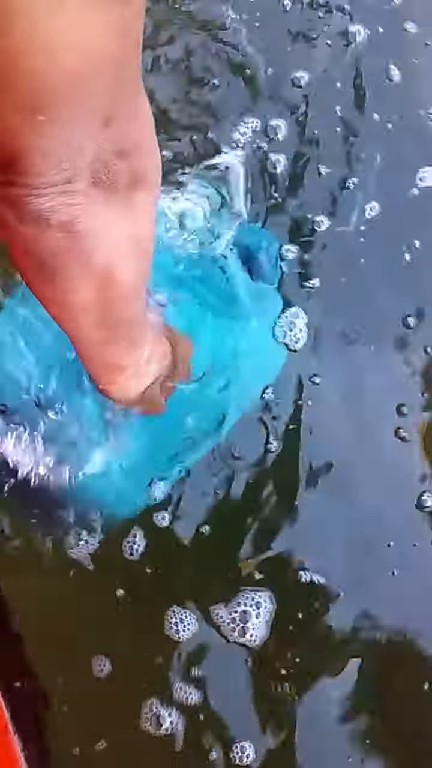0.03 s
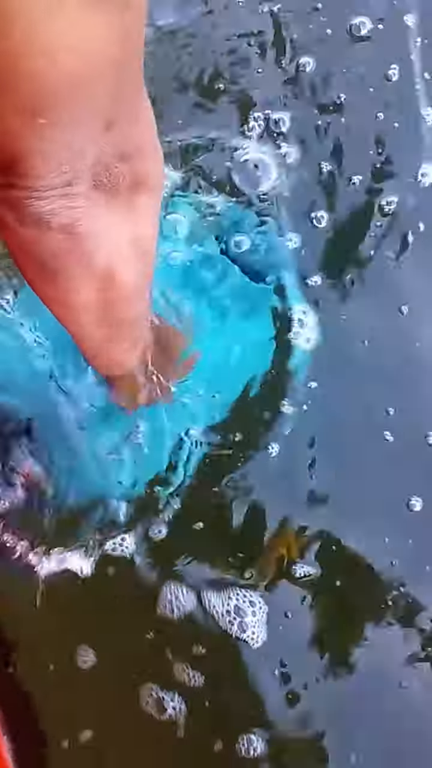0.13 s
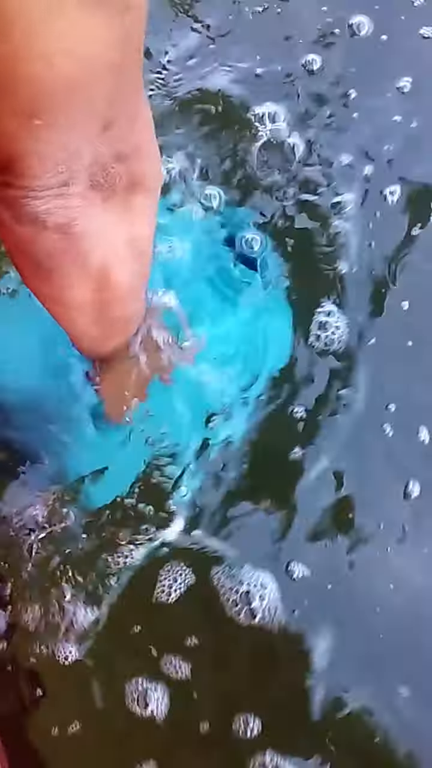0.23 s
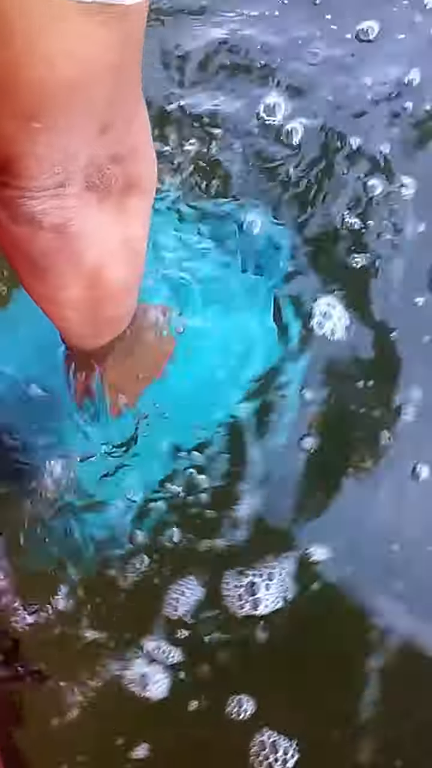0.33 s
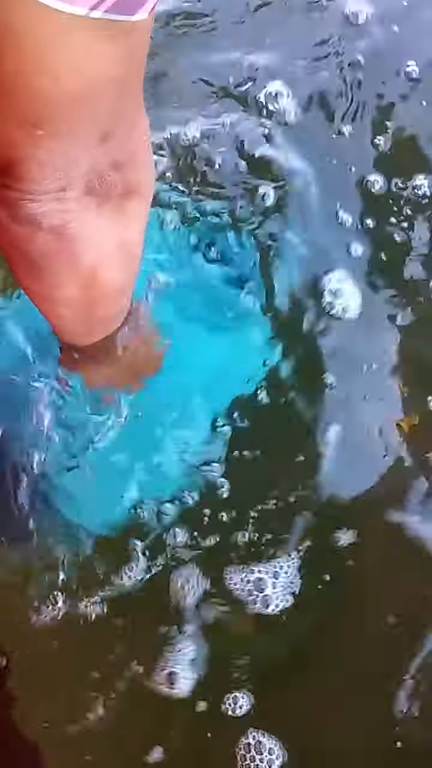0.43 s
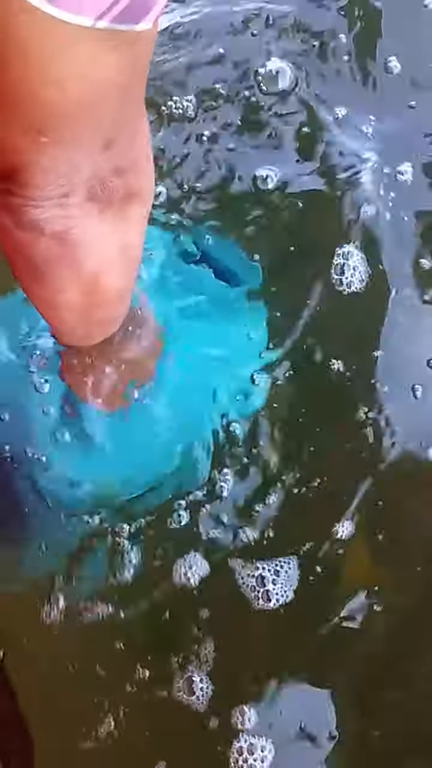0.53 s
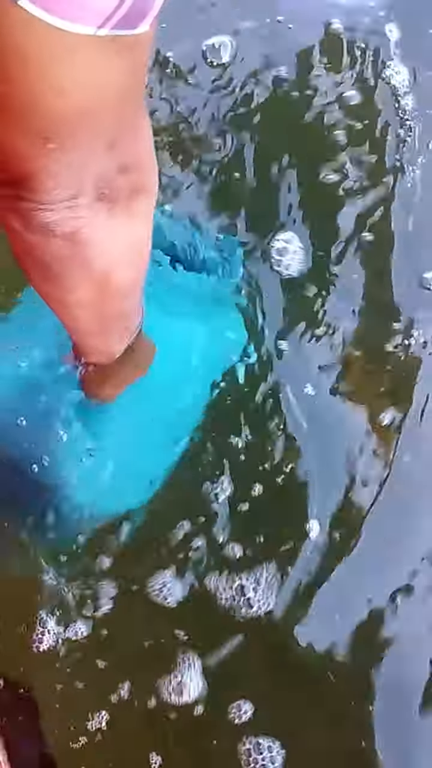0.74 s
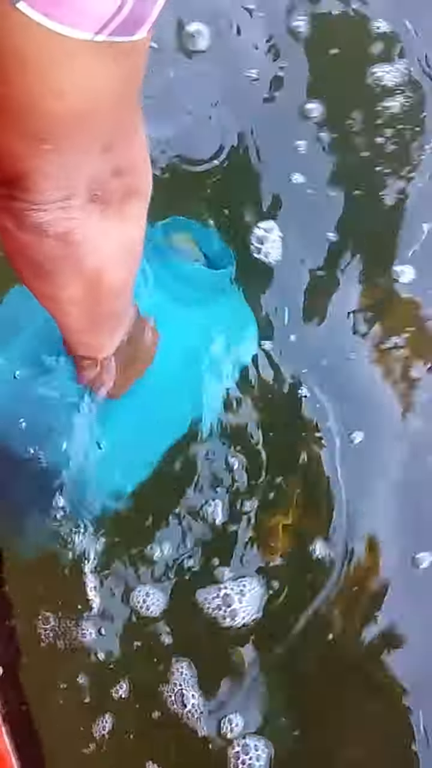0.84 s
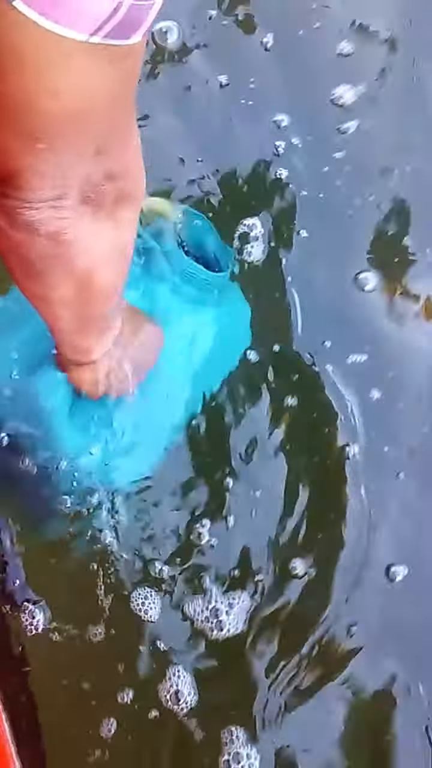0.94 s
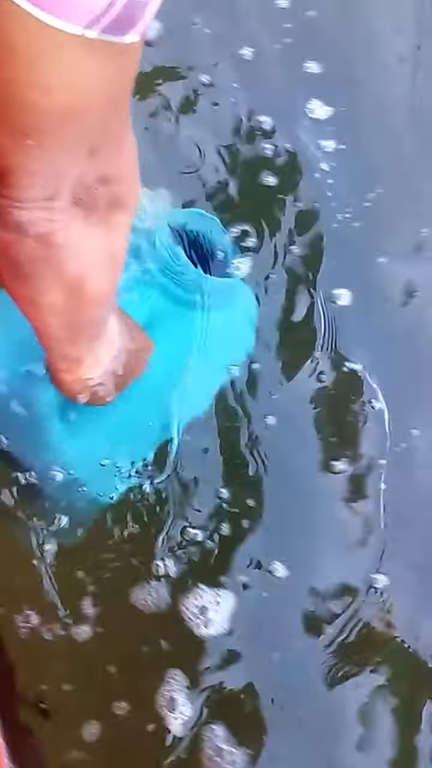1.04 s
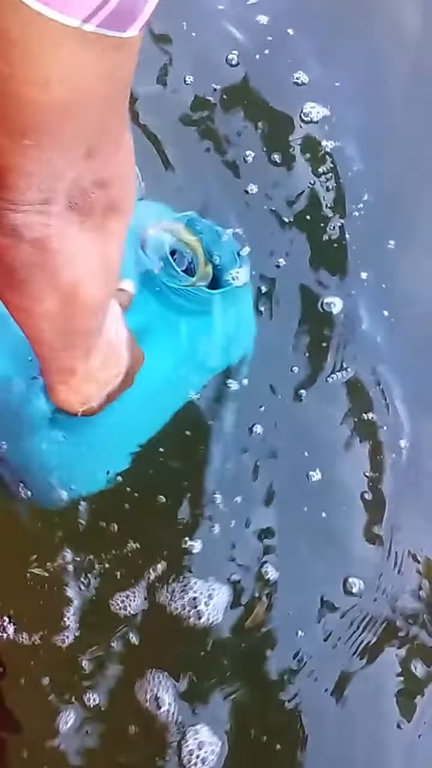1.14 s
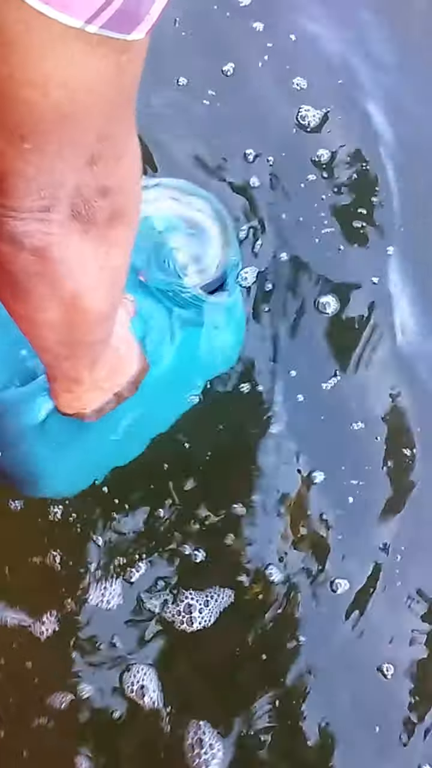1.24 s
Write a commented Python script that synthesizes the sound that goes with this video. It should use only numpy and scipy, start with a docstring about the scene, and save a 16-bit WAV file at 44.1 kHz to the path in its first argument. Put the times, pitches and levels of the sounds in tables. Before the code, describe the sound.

Water gurgles into a plastic can pushed under the sea, close by. Faint foam fizz and a few bubble plinks open the first 0.3 seconds. From about 0.2 seconds a low rumble with dull thumps swells, like wind on the microphone, loudest from 0.4 to 0.6 with glugs and one click. After a smaller glug at 0.8, faint lapping remains, with a soft thump and tiny splash near 1.2.

```python
"""Foam fizzes and a few bubbles plink as a plastic can is pushed under the sea to fill, close by.
A low rumble swells with dull thumps, probably wind buffeting the microphone, while water gurgles
into the can. Each bubble is a damped resonator, its air the spring and the water the mass:
larger ones glug, small ones plink. It settles to faint lapping, with a last soft thump."""
import sys
import numpy as np
from scipy.fft import rfft, irfft, next_fast_len
from scipy.io import wavfile
from scipy.ndimage import uniform_filter1d, map_coordinates

SR = 44100
rng = np.random.default_rng(int(sys.argv[2]) if len(sys.argv) > 2 else 0)


def wav_out(sig):
    """Save sig, one row per channel (or a flat mono array), as 16-bit PCM at SR to the path in sys.argv[1]."""
    wavfile.write(sys.argv[1], SR, np.round(np.clip(np.atleast_2d(sig).T, -1, 1) * 32767).astype(np.int16))


N = 57330
TIME = np.arange(N) / SR


# Low thumps. Each row: time of the crest in seconds, level in dB, pitch in Hz.
LOW_THUMPS = [(.101, -32, 110), (.236, -13.5, 76.4), (.250, -5.5, 162), (.284, -5.5, 133),
              (0.319, -7.5, 135), (0.384, -3.5, 123), (0.4166, -1, 179), (.519, -6, 132.4),
              (0.5387, -2, 118.6), (.591, -21.5, 161), (0.629, -18.5, 160), (0.7112, -14.5, 219),
              (.723, -11.5, 102), (.754, -17, 164), (0.83, -24, 132), (1.148, -33, 91), (1.184, -20, 121)]
def thumps():
    """Short, dull pressure pulses of one or two cycles, probably wind buffeting the microphone."""
    return tone_pulses([(s, db, hz, 0.52) for s, db, hz in LOW_THUMPS], rise_share=0.86)


# Rumble envelope. Each row: time in seconds, level in dB.
RUMBLE_LEVEL = [(0, -42), (.15, -53.5), (.175, -24.5), (.22, -26), (.245, -23), (.32, -17.5), (.34, -24.5),
                (.385, -14.5), (.46, -13), (.5, -17.5), (.53, -11.5), (.592, -15), (.61, -28), (.68, -36.5),
                (.73, -25.5), (.79, -26), (.835, -31.5), (.878, -48.5), (1.12, -42.5), (1.16, -35.5),
                (1.195, -38.5), (1.235, -54), (1.3, -58)]
# Rumble spectrum. Each row: frequency in Hz, gain in dB.
RUMBLE_SPECTRUM = [(22, -36), (36, -21.5), (58, 3), (85, 1.5), (135, -2), (200, -10), (270, -12.5),
                   (400, -30), (700, -66.5), (1500, -96)]
def rumble():
    """Irregular pressure swings, probably wind, form low-frequency noise under the thumps."""
    return level(RUMBLE_LEVEL) * even(noise(RUMBLE_SPECTRUM), size=900)


# Small, tight air pockets. Each row: crest in seconds, level in dB, pitch in Hz, decay in cycles.
GLUG_POCKETS = [(.356, -28.5, 480, 1.3), (.370, -19, 490, 0.71), (.393, -25.5, 617, 0.72),
                (.415, -19.5, 520, 0.3), (.446, -21, 586, 0.56), (.457, -20, 570, 0.5),
                (.4755, -19, 636, 1.6), (.4805, -14.5, 695, 0.63), (.496, -20, 520, 0.86),
                (.5305, -15, 556, 0.34), (.5518, -8.5, 426, 0.45), (.567, -27.5, 530, 1.65),
                (.578, -17.5, 450, 0.88), (.710, -37, 690, 0.77), (.7505, -42, 560, 1.5),
                (.8205, -18.5, 348, 0.88)]
def glugs():
    """Small air pockets resonate under heavy damping, dying within a few cycles."""
    return tone_pulses(GLUG_POCKETS, rise_share=0.71)


# Gurgle envelope. Each row: time in seconds, level in dB.
GURGLE_LEVEL = [(0, -41), (.03, -55), (.1, -51.5), (.148, -71), (.18, -48), (.25, -37), (.34, -47),
                (.365, -34.5), (.41, -22.5), (.435, -39), (.476, -17.5), (.505, -36), (.54, -22.5),
                (.582, -38.5), (.61, -40), (.69, -59.5), (.715, -37), (.785, -57.5), (.82, -36.5),
                (.86, -62), (1.3, -55)]
# Gurgle spectrum. Each row: frequency in Hz, gain in dB.
GURGLE_SPECTRUM = [(150, -20.5), (280, 6), (400, 6.5), (560, -3), (720, -12.5), (950, -15.5), (1150, -29.5),
                   (1600, -33.5), (2200, -52), (3500, -47), (5000, -79.5)]
def gurgle():
    """Water churns into the can: many muffled resonances superpose into a fluttering noise."""
    swarm = bubble_swarm(per_second=420, hz=482, spread=0.5, cycles=1.7, scatter_db=4.5)
    churn = noise(GURGLE_SPECTRUM) + amp(-4) * unit(coloured(swarm, GURGLE_SPECTRUM))
    churn *= flutter(per_second=130, depth_db=5.5)
    return level(GURGLE_LEVEL) * even(churn, size=700)


# Ringing bubbles and drips. Each row: start in seconds, level in dB, pitch in Hz,
# time to fall 60 dB in seconds, pitch rise in Hz per second.
PLINK_BUBBLES = [(.001, -23.5, 2240, 0.024, 22100), (.001, -25.5, 1790, 0.013, 9000),
                 (.001, -31.5, 324.5, 0.066, 9070), (0.039, -52.5, 1088, 0.15, 4100),
                 (.062, -70, 1780, 0.05, 3000), (0.151, -45.5, 2870, 0.017, 5000),
                 (0.161, -42.5, 5790, 0.021, 9000), (.179, -22, 1758, 0.03, 13500),
                 (.179, -27.5, 2290, 0.018, 5000), (.184, -22.5, 1870, 0.039, 9300),
                 (.186, -38, 2990, 0.01, 3000), (.201, -35, 2300, 0.025, 16000),
                 (.262, -42, 2830, 0.012, 9000), (0.2774, -17, 2013, 0.029, 1500),
                 (0.302, -20.5, 2160, .011, 5000), (0.301, -32, 2800, 0.014, 5000),
                 (1.196, -51, 6100, 0.018, 5000), (1.22, -49, 7000, 0.014, 5000),
                 (1.264, -50, 4400, 0.011, 40000)]
def plinks():
    """A bubble nearing the surface moves less water mass, so its resonance rises as it rings."""
    attack_s, roundness = 0.0022, 1.198  # roundness above 1: the ring holds, then dies faster
    out = np.zeros(N)
    for start, db, hz, t60, rise in PLINK_BUBBLES:
        t = np.clip(TIME - start, 0, 2 * t60)
        envelope = amp(db - 60 * (t / t60) ** roundness) * (1 - np.exp(-t / attack_s))
        out += envelope * np.sin(2 * np.pi * (hz + rise * t / 2) * t)
    return out


# Click spectrum. Each row: frequency in Hz, gain in dB.
CLICK_SPECTRUM = [(300, -15), (1200, -6), (2500, -4.5), (5000, -8), (10000, -7), (15000, -8)]
def click():
    """One hard click on the biggest thump: so short a pulse spans a wide band."""
    start_s, decay_s = 0.415, 0.00017
    t = (np.arange(N) - round(start_s * SR)) / SR
    return coloured(amp(-7.5) * np.exp(-np.abs(t) / decay_s) * (t >= 0), CLICK_SPECTRUM)


# Ticks. Each row: start in seconds, level before filtering in dB, time to fall 60 dB in seconds.
TICK_BURSTS = [(.1795, -31, 0.015), (.2422, -22.5, .006), (.2785, -31, 0.008), (.303, -27.5, .008),
               (.3165, -33, 0.015), (.3695, -32.5, 0.0029), (.4625, -32, 0.0029), (.471, -37, .005),
               (.4795, -31, .006), (.5095, -36, .003), (.5303, -20.5, .003), (.5385, -24.5, .003),
               (.5507, -28, .003), (.6165, -36, 0.0066)]
# Tick spectrum. Each row: frequency in Hz, gain in dB.
TICK_SPECTRUM = [(300, -13), (1000, 0.5), (2200, -5), (3600, -15.5), (4800, -33), (7500, -17), (15000, -37)]
def ticks():
    """Bursting water radiates sharp broadband transients."""
    return noise_bursts(TICK_BURSTS, TICK_SPECTRUM)


# Splashes. Each row: start in seconds, level before filtering in dB, time to fall 60 dB in seconds.
SPLASH_BURSTS = [(.18, -41, 0.027), (1.191, -48, .06)]
# Splash spectrum. Each row: frequency in Hz, gain in dB.
SPLASH_SPECTRUM = [(600, -7), (1400, 11), (2400, -2), (4500, -15), (6500, -2), (10000, -24), (15000, -21.5)]
def splashes():
    """Small splashes radiate noise that decays exponentially."""
    return noise_bursts(SPLASH_BURSTS, SPLASH_SPECTRUM)


# Spits. Each row: start in seconds, level before filtering in dB, time to fall 60 dB in seconds.
SPIT_BURSTS = [(.279, -60, 0.018), (.342, -56, 0.014), (.719, -48.5, 0.025), (.843, -59.5, .03),
               (1.196, -60, .015)]
# Spit spectrum. Each row: frequency in Hz, gain in dB.
SPIT_SPECTRUM = [(2000, 0), (4500, -5), (6500, 8), (9000, -11), (13000, -9), (15800, -9.5)]
def spits():
    """Rupturing foam gives off brief, bright transients."""
    return noise_bursts(SPIT_BURSTS, SPIT_SPECTRUM)


# Fizz envelope. Each row: time in seconds, level in dB.
FIZZ_LEVEL = [(0, -50.5), (.03, -55), (.08, -52.5), (.15, -56), (.22, -61.5), (.3, -64.5), (.4, -68),
              (.55, -72.5), (.72, -71), (.85, -74), (1.0, -80), (1.14, -79.5), (1.21, -71.5), (1.3, -74.5)]
# Fizz spectrum. Each row: frequency in Hz, gain in dB.
FIZZ_SPECTRUM = [(2000, -24), (3600, -9), (4900, -14.5), (6300, -2.5), (8700, -3.5), (10700, -9.5),
                 (13000, -14.5), (15800, -26)]
def fizz():
    """Resonant frequency varies inversely with radius, so tiny foam bubbles pop high over a hiss."""
    pops = bubble_swarm(per_second=380, hz=8400, spread=0.34, cycles=33, scatter_db=6.5)
    foam = noise(FIZZ_SPECTRUM) + amp(-4.5) * unit(coloured(pops, FIZZ_SPECTRUM))
    return level(FIZZ_LEVEL) * unit(foam)


# Bubbling envelope. Each row: time in seconds, level in dB.
BUBBLING_LEVEL = [(0, -61.5), (.15, -64.5), (.31, -60.5), (.39, -62), (.56, -67.5), (.63, -70), (.8, -75.5),
                  (.9, -77), (1.16, -75.5), (1.2, -70.5), (1.3, -71)]
# Bubbling spectrum. Each row: frequency in Hz, gain in dB.
BUBBLING_SPECTRUM = [(900, -23), (1500, -5), (2150, 0.5), (2800, -12.5), (3600, -3.5), (4600, -3),
                     (8000, -40)]
def bubbling():
    """Fine bubbles around the can ring at random times and add incoherently."""
    beads = bubble_swarm(per_second=1600, hz=2580, spread=0.3, cycles=9.4, scatter_db=2.0)
    return level(BUBBLING_LEVEL) * unit(coloured(beads, BUBBLING_SPECTRUM))


# Sea spectrum. Each row: frequency in Hz, gain in dB.
SEA_SPECTRUM = [(30, 8.5), (120, 11.5), (350, -4.5), (600, -10), (900, -8.5), (2200, -15), (3000, -19.5),
                (5000, -23.5), (10000, -35), (15800, -20)]
def background():
    """Quiet lapping merges into stationary noise, under a faint, steady pure tone."""
    whine = unit(np.sin(2 * np.pi * 15000 * TIME))
    return amp(-56) * noise(SEA_SPECTRUM) + amp(-79.5) * whine


def tone_pulses(rows, rise_share):
    """Brief rising tones under Gaussian envelopes; rise_share is swell time over decay time."""
    glide = 0.033  # relative pitch rise per cycle
    out = np.zeros(N)
    for crest, db, hz, decay_cycles in rows:
        turns = np.clip((TIME - crest) * hz, -10, 10)
        width = np.where(turns < 0, rise_share * decay_cycles, decay_cycles)
        envelope = amp(db) * np.exp(-.5 * (turns / width) ** 2)
        out -= envelope * np.sin(2 * np.pi * turns * (1 + glide * turns / 2))
    return out


def bubble_swarm(per_second, hz, spread, cycles, scatter_db):
    """Damped resonators, log-normal in pitch about hz, each falling 60 dB over `cycles`; rms 1."""
    when, size, u, v = rng.random((int(per_second * N / SR), 4)).T
    pitch = hz * np.exp(spread * np.sqrt(-2 * np.log(1 - u)) * np.cos(2 * np.pi * v))
    age = np.arange(int(2 * cycles * SR / hz))
    turns = np.minimum(pitch, SR / 2)[:, None] * age / SR
    rings = np.sin(2 * np.pi * turns) * amp(-60 * turns / cycles) * (1 - np.exp(-2 * turns))
    rings *= amp(-scatter_db * np.log(1 - 0.96 * size))[:, None]  # 0.96 caps the loudest bubbles
    samples = (when * N).astype(int)[:, None] + age
    return unit(np.bincount(samples.ravel(), rings.ravel(), N)[:N])


def noise_bursts(rows, spectrum):
    """Exponentially decaying bursts of noise through one filter."""
    out = np.zeros(N)
    for start, db, t60 in rows:
        t = TIME - start
        out += amp(db - 60 * np.abs(t) / t60) * (t >= 0) * rng.standard_normal(N)
    return coloured(out, spectrum)


def flutter(per_second, depth_db):
    """Amplitude modulation: a gain gliding between random values."""
    knots = rng.standard_normal(int(N * per_second / SR) + 4)
    return amp(depth_db * map_coordinates(knots, [TIME * per_second]))


def even(x, size):
    """Division by the running rms, smoothed over `size` samples, removes slow swells."""
    power = uniform_filter1d(uniform_filter1d(x ** 2, size), size)
    return unit(x / np.sqrt(np.abs(power) + 1e-9))


def noise(spectrum):
    """Coloured noise of rms 1."""
    return unit(coloured(rng.standard_normal(N), spectrum))


def coloured(x, spectrum):
    """Spectral shaping by (Hz, dB) points on a log frequency axis."""
    freqs, db = np.transpose(spectrum)
    return filtered(x, lambda hz: amp(np.interp(np.log(hz + 1), np.log(freqs), db)))


def filtered(x, response):
    """Linear filtering: the spectrum of x times a frequency response."""
    size = next_fast_len(N + 8192)
    return irfft(rfft(x, size) * response(np.fft.rfftfreq(size, 1 / SR)), size)[:N]


def level(rows):
    """Amplitude envelope through (s, dB) points."""
    return amp(np.interp(TIME, *np.transpose(rows)))


def unit(x):
    """Normalisation to rms 1."""
    return x / np.sqrt(np.mean(x ** 2) + 1e-20)


def amp(db):
    """Decibels to amplitude ratio."""
    return 10 ** (np.asarray(db) / 20)


def scene():
    """Superposition: the pressures of all sources add at one point."""
    low_sounds = thumps() + rumble() + glugs() + gurgle()
    surface = plinks() + click() + ticks() + fizz() + bubbling() + spits() + splashes()
    return (low_sounds + surface + background())[None]


# Brief level dips. Each row: centre in seconds, half length in seconds, depth in dB.
LEVEL_DIPS = [(0.237, .004, 33), (0.608, 0.0081, 31.5)]
def record(dry):
    """A crossover spares the bass while the band above dips twice; a low-pass limits the treble."""
    crossover_hz, top_hz = 120, 15900
    bass = filtered(dry[0], lambda hz: 1 / (1 + (hz / crossover_hz) ** 6))
    dip_db = sum(db * np.exp(-((TIME - centre) / half) ** 4) for centre, half, db in LEVEL_DIPS)
    dipped = bass + amp(-dip_db) * (dry[0] - bass)
    return filtered(dipped, lambda hz: hz < top_hz)[None]


dry = scene()
out = record(dry)
wav_out(out)
```